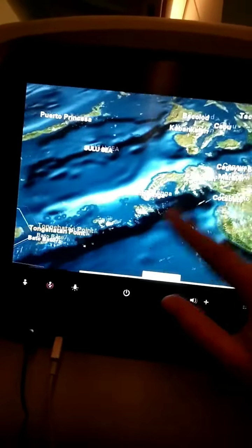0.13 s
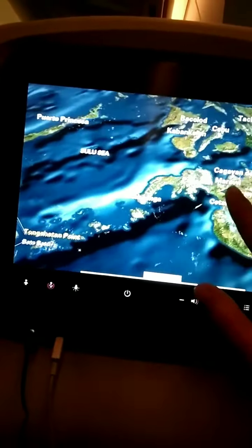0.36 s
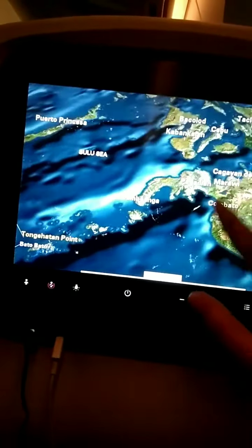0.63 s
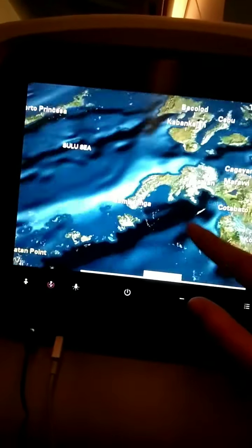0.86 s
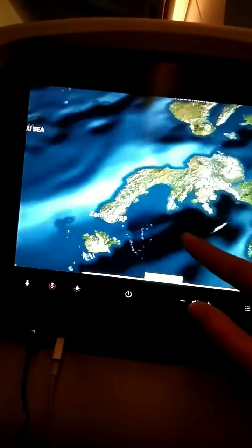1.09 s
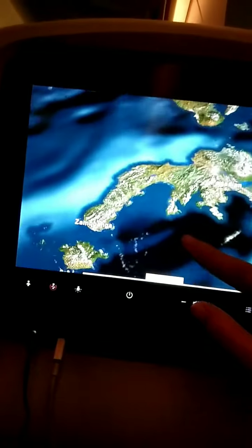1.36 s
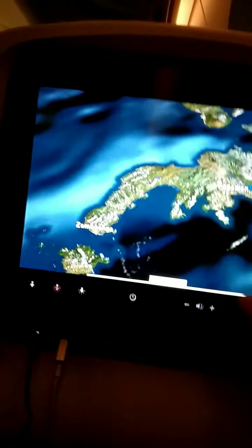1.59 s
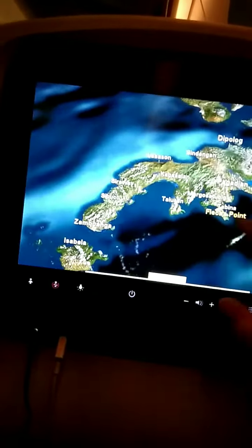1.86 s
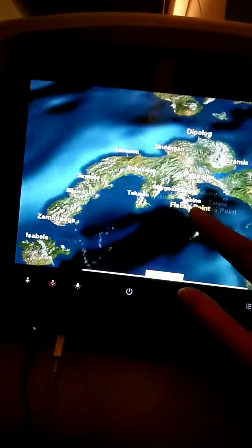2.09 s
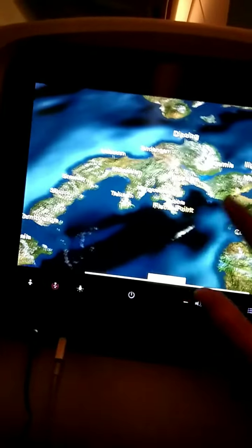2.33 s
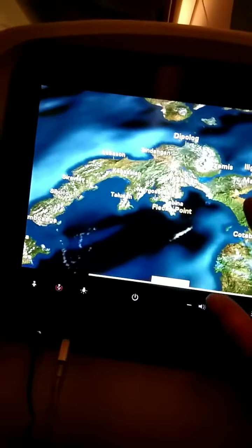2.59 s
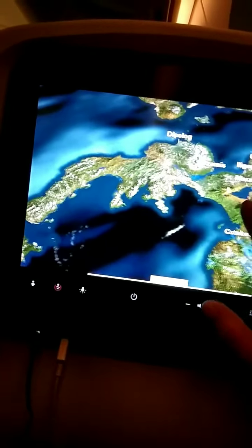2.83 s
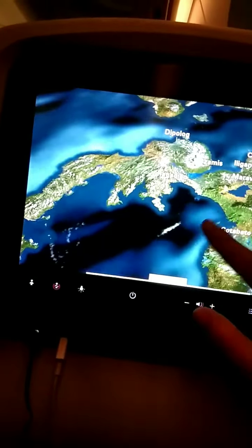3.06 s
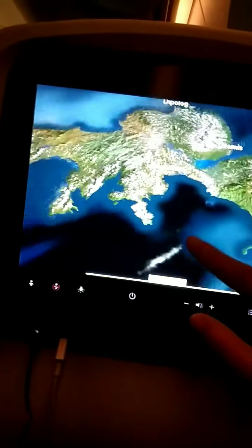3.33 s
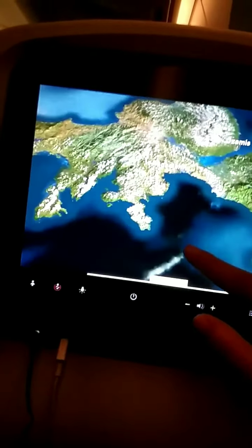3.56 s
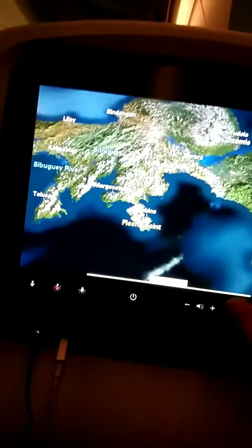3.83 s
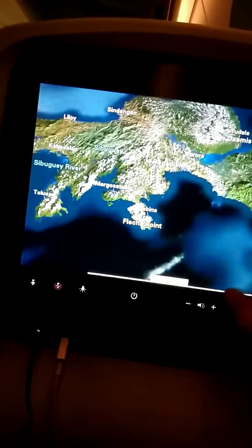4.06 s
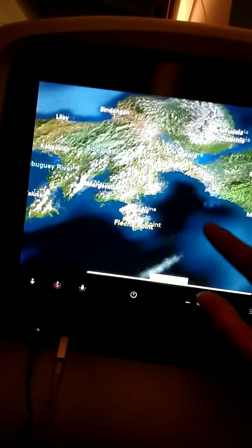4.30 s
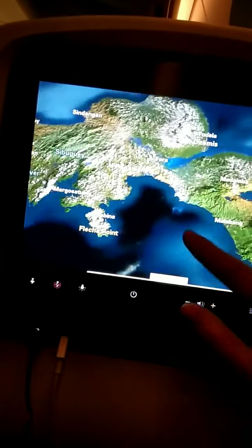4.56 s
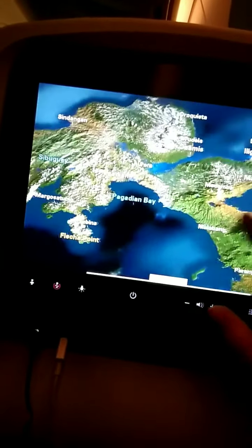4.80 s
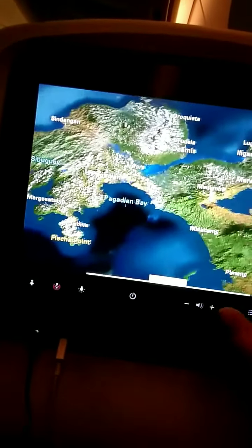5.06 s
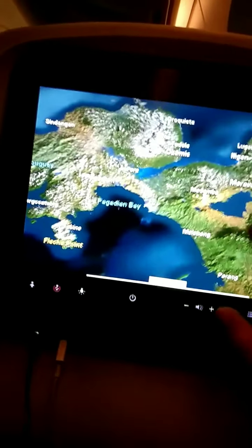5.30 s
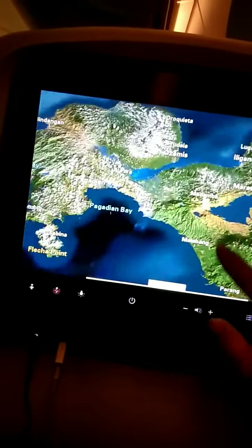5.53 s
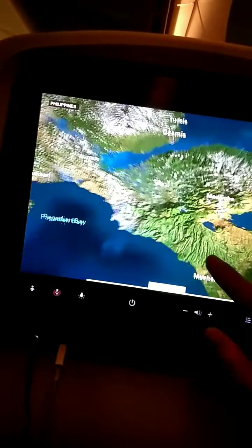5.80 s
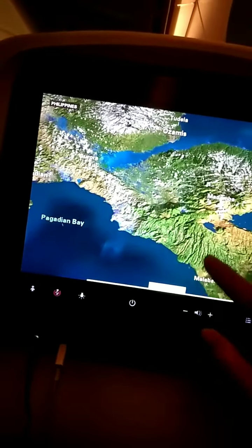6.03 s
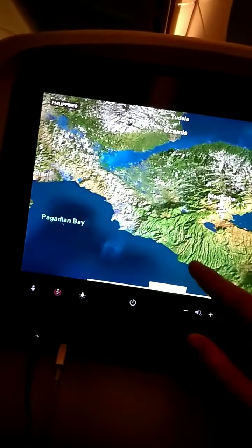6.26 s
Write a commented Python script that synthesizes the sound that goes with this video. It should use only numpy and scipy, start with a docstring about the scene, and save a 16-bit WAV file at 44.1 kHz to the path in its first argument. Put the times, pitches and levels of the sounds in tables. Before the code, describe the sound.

A broad low rumble comes through the cabin wall and stays constant from start to end, growing almost imperceptibly. Over it sit a gentle flickering wind rush and a much quieter, rough-edged hiss from a close air vent. Faint wavering low hums blend into the noise. Close, enclosed, mono seat perspective with little high treble; screen touches make no sound.

```python
"""Deep roar in an airliner cabin in cruise, taken in mono from a passenger seat.
Air rushing along the hull and the engines' jets come through the wall as one shaped noise.
Close by, an air vent hisses: noise with a fast, ragged flutter in its level.
Pumps and fans hum thin sine tones, and the microphone, dull above 7 kHz, adds a faint hiss."""
import sys
import numpy as np
from scipy import signal
from scipy.fft import rfft, irfft
from scipy.io import wavfile

SR = 44100
rng = np.random.default_rng(int(sys.argv[2]) if len(sys.argv) > 2 else 0)


def magnitude_from_level(level_db):
    """Linear magnitude for a level in decibels (20 dB per decade)."""
    exponent = np.asarray(level_db, float) / 20
    return 10 ** exponent


def master_out(mix):
    """Clip the mix to full scale and print it as 16-bit PCM to the path in sys.argv[1]."""
    frames = np.transpose(np.atleast_2d(mix))
    ceiling = np.clip(frames, -1, 1)
    pcm = np.round(ceiling * 32767).astype(np.int16)
    wavfile.write(sys.argv[1], SR, pcm)


N = 282220  # length in samples, 6.4 s


def rms_one(x):
    """Scale to unit rms."""
    return x / np.sqrt(np.mean(x ** 2) + 1e-20)


def drift(rate_hz):
    """Slow chance: noise twice through a one-pole low-pass, run in for 1 s; mean 0, spread 1."""
    pole = np.exp(-2 * np.pi * rate_hz / SR)
    noise = rng.standard_normal(N + SR)
    slow = signal.lfilter([1], [1, -2 * pole, pole ** 2], noise)[SR:]
    return rms_one(slow - slow.mean())


def colour(x, spectrum, bumps=(), band_hz=(0, SR)):
    """Shape x by a spectrum and bell-shaped bumps; return its transform, rms 1 inside the band, and Hz."""
    hz = np.maximum(np.arange(N // 2 + 1) * SR / N, 1)
    point_hz, point_db = np.array(spectrum).T
    gain_db = np.interp(np.log(hz), np.log(point_hz), point_db)
    for centre_hz, width_hz, bump_db in bumps:
        # the width is where the bump falls to half its dB
        gain_db = gain_db + bump_db * np.exp(-np.log(16) * ((hz - centre_hz) / width_hz) ** 2)
    shaped = rfft(x) * magnitude_from_level(gain_db)
    inside = (hz >= band_hz[0]) & (hz < band_hz[1])
    band_rms = np.sqrt(2 * np.sum(np.abs(shaped[inside]) ** 2)) / N
    return shaped / band_rms, hz


def tone(pitch_hz, level_db, waver_db):
    """A sine whose level wavers as the cabin's modes shift."""
    phase = 2 * np.pi * (pitch_hz * np.arange(N) / SR + rng.random())
    wavering = magnitude_from_level(level_db + waver_db * drift(3.4))
    return np.sqrt(2) * wavering * np.sin(phase)


def hums():
    """Two rotating pumps or fans hum at multiples of a base pitch, beside a few lone tones."""
    # base pitch of each machine: base_hz
    machine_hz = [427.8, 450.0]
    # harmonics of each machine: multiple [of base_hz], level_db [rms]
    machine_harmonics = [
        [(1, -43.5), (2, -55.5), (3, -69), (5, -65)],
        [(1, -46), (2, -62)],
    ]
    # pitch of each lone tone: pitch_hz
    lone_hz = [193.6, 1316.2, 11218.5]
    # strength of each lone tone: level_db [rms], waver_db
    lone_levels = [(-34, 2), (-65.5, 5), (-94.5, 0.5)]
    out = np.zeros(N)
    for base_hz, harmonics in zip(machine_hz, machine_harmonics):
        for multiple, level_db in harmonics:
            out += tone(multiple * base_hz, level_db, waver_db=1.5)
    for pitch_hz, (level_db, waver_db) in zip(lone_hz, lone_levels):
        out += tone(pitch_hz, level_db, waver_db)
    return out


def vent():
    """The whole hiss flutters together, slowly and with a ragged buzz near 75 Hz."""
    # hiss as the microphone colours it: pitch_hz, density_db [relative dB per Hz]
    vent_spectrum = [(2000, -32), (3300, -10), (4100, -1), (5000, -0.5), (6800, -1), (7400, -5),
                     (8200, -18.5), (9200, -26.5), (10400, -32.5), (11500, -39.5), (16000, -49.5)]
    # echoes between seat and lining raise and cancel bands: centre_hz, width_hz, bump_db
    seat_echoes = [(4430, 200, -6), (4690, 80, 2), (4860, 100, -2), (5080, 260, 4), (5360, 200, -3),
                   (5740, 200, 1.5), (6500, 100, -3), (6680, 250, 2.5), (7030, 130, -4), (7500, 250, -4),
                   (8170, 220, -4), (8340, 160, 3), (8620, 170, -5), (10720, 200, -6)]
    level_db = -46.5  # rms from 4 to 9 kHz
    buzz_band = signal.butter(1, [45, 120], "band", fs=SR, output="sos")
    buzz = signal.sosfilt(buzz_band, rng.standard_normal(N))
    flutter_db = 1.13 * drift(16) + 2.2 * rms_one(buzz)
    jet = rng.standard_normal(N) * magnitude_from_level(flutter_db)
    shaped, _ = colour(jet, vent_spectrum, seat_echoes, (4000, 9000))
    return magnitude_from_level(level_db) * irfft(shaped, N)


def roar():
    """One noise through the wall: the deep part gains slowly, the rush above it flickers a little."""
    # roar through the wall: pitch_hz, density_db [relative dB per Hz]
    roar_spectrum = [(12, -26.5), (28, -23), (42, -26.5), (68, -8), (82, -6.5), (95, 0.5), (150, -3.5),
                     (225, -4.5), (268, -12), (373, -19.5), (440, -20.5), (520, -26.5), (650, -32),
                     (866, -33), (1210, -38), (1760, -35.5), (2800, -40), (3600, -45.5), (6000, -56),
                     (9000, -96.5)]
    # the wall panels tilt the balance of a few bands: centre_hz, width_hz, bump_db
    wall_panels = [(98.3, 20, 0.5), (157.7, 23, 1.5), (223, 34, 1), (303, 25, 2.5), (800, 33, 2),
                   (884, 36, 2), (1040, 60, 2), (1062, 30, -2.5), (1110, 22, 5.5), (1300, 56, 1.5),
                   (1750, 100, 1.5), (2580, 140, 0.5)]
    split_hz = 300  # between deep part and rush
    deep_db = -22 + 0.1931 * np.arange(N) / SR  # start level, then rise in dB per second
    rush_db = -33.5 + 0.6 * drift(26)
    white = rng.standard_normal(N)
    out = np.zeros(N)
    for low_hz, high_hz, level_db in [(0, split_hz, deep_db), (split_hz, SR, rush_db)]:
        shaped, hz = colour(white, roar_spectrum, wall_panels, (low_hz, high_hz))
        inside = (hz >= low_hz) & (hz < high_hz)
        out += magnitude_from_level(level_db) * irfft(shaped * inside, N)
    return out


def scene():
    """All sources as heard at one seat, in one channel."""
    return (hums() + vent() + roar())[None]


def self_noise():
    """The microphone's own faint, steady hiss, strongest in the top treble."""
    # self-noise: pitch_hz, density_db [relative dB per Hz]
    noise_spectrum = [(8000, -8), (11500, -3.5), (12300, -6), (13000, -6), (14150, 1), (14700, -6.5),
                      (15300, 3), (17000, -4)]
    level_db = -84.5  # rms from 12 to 15.4 kHz
    shaped, _ = colour(rng.standard_normal(N), noise_spectrum, band_hz=(12000, 15400))
    return magnitude_from_level(level_db) * irfft(shaped, N)


def top_cut(x):
    """Nothing passes above the cut-off."""
    return signal.sosfilt(signal.butter(12, 15490, fs=SR, output="sos"), x)


def record(dry):
    """The microphone adds its faint hiss to the cabin sound."""
    mix = dry + self_noise()
    return top_cut(mix)


dry = scene()
out = record(dry)
master_out(out)
```